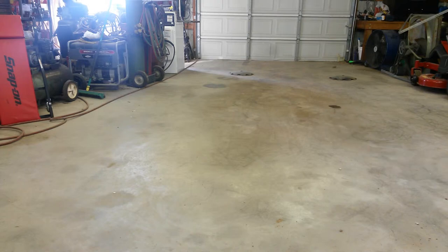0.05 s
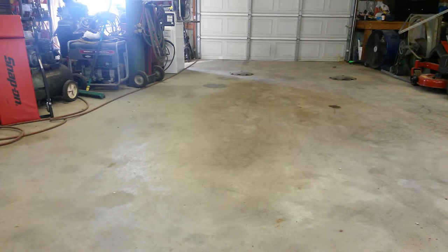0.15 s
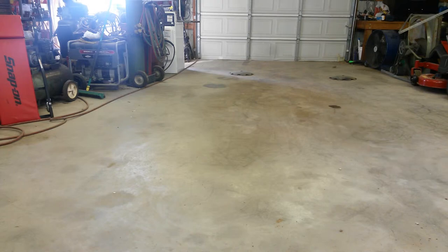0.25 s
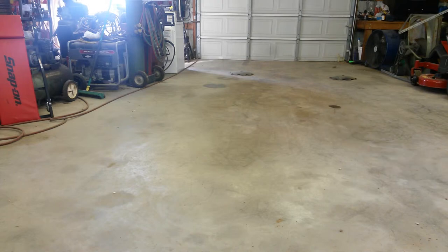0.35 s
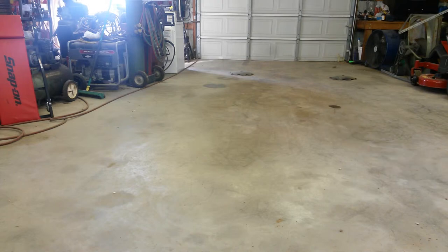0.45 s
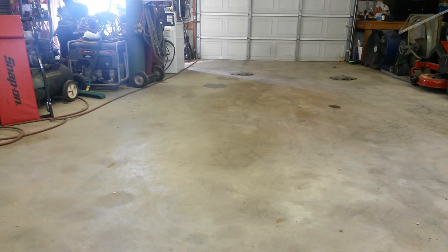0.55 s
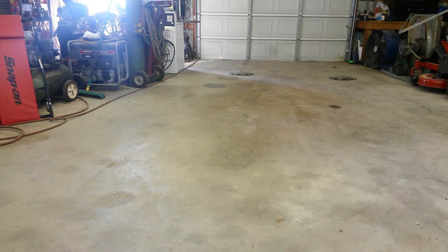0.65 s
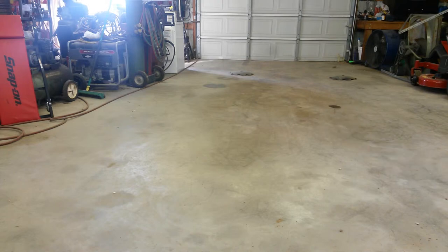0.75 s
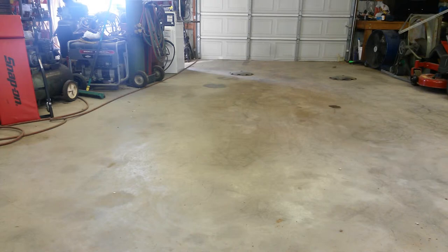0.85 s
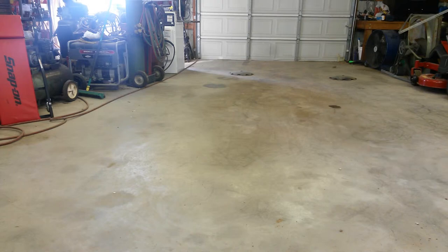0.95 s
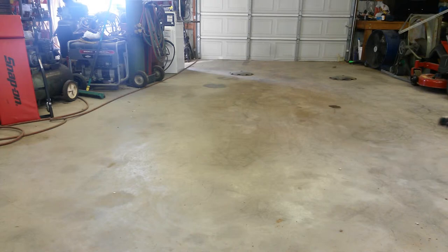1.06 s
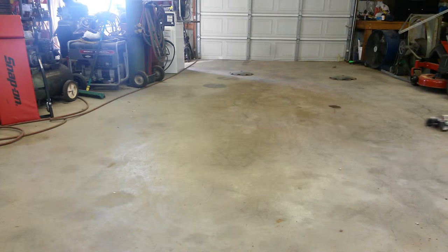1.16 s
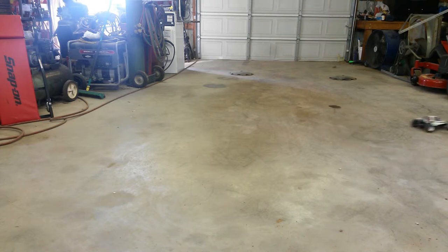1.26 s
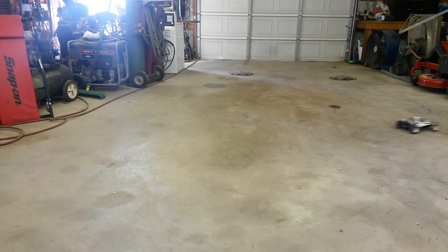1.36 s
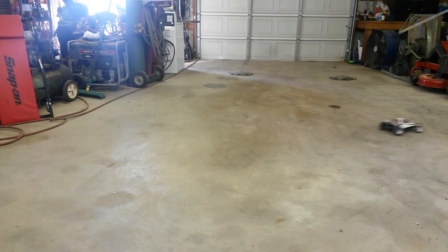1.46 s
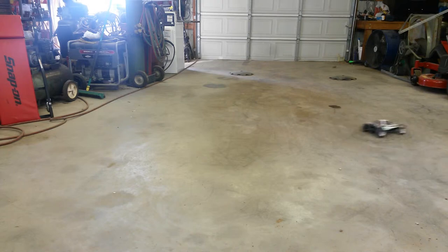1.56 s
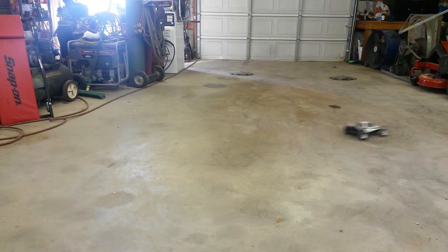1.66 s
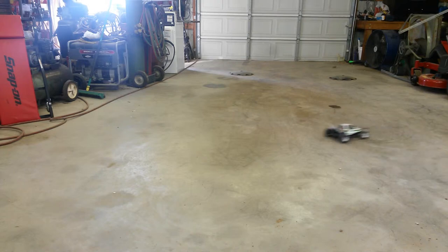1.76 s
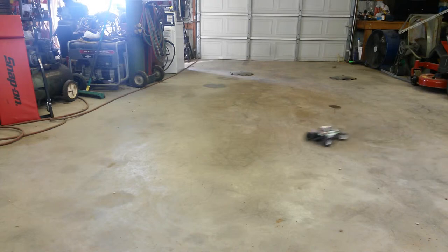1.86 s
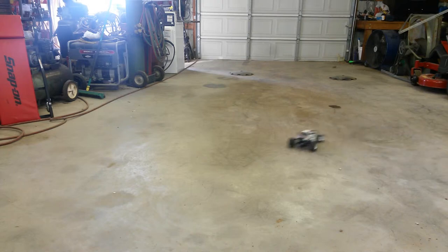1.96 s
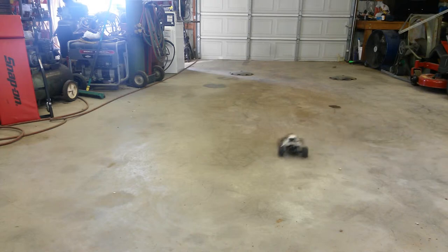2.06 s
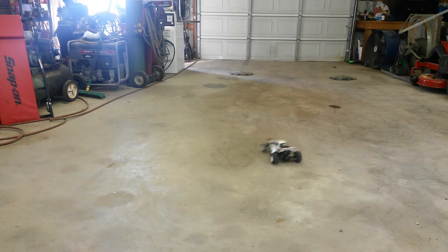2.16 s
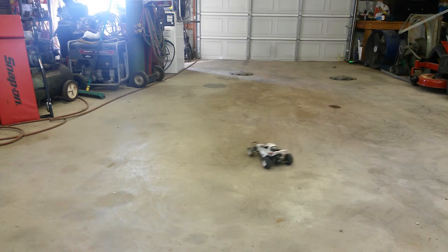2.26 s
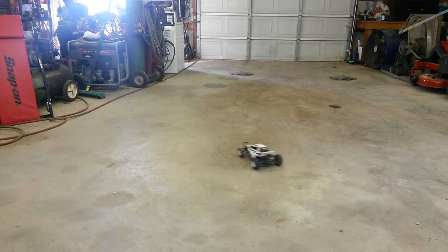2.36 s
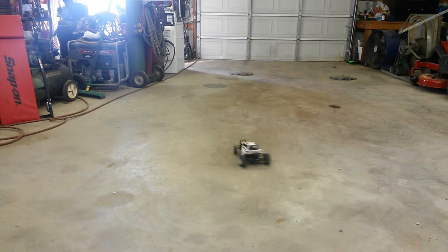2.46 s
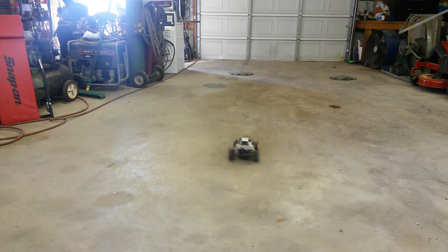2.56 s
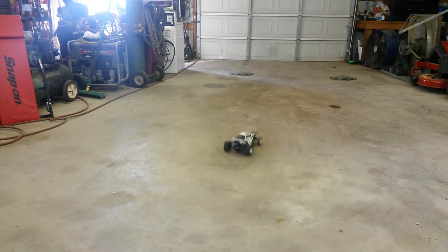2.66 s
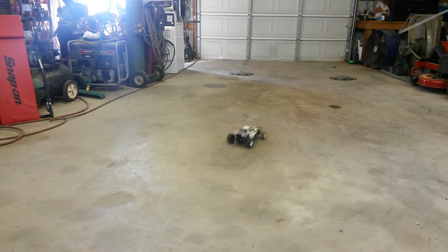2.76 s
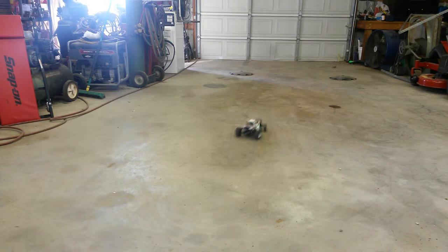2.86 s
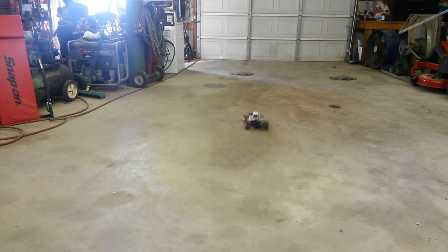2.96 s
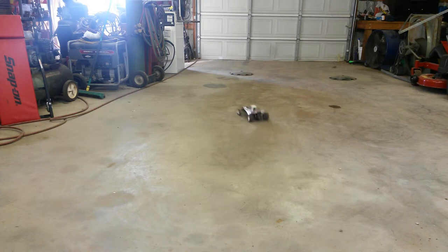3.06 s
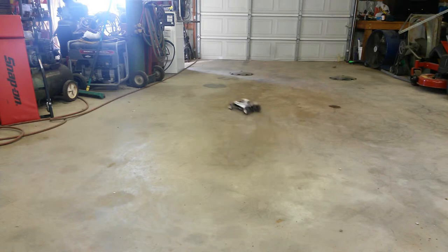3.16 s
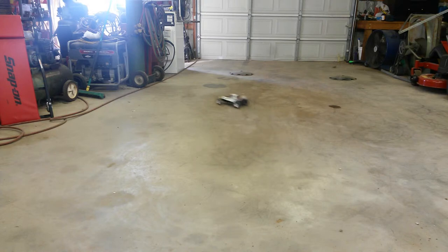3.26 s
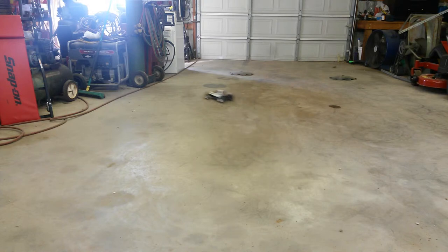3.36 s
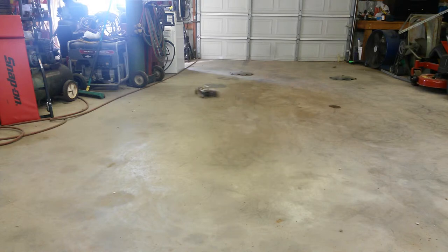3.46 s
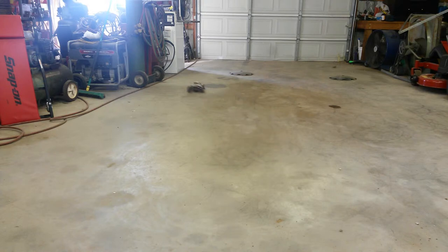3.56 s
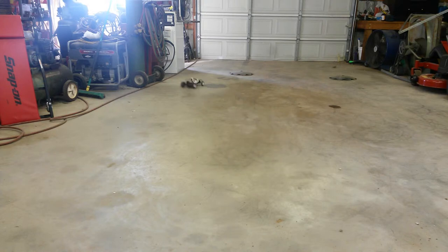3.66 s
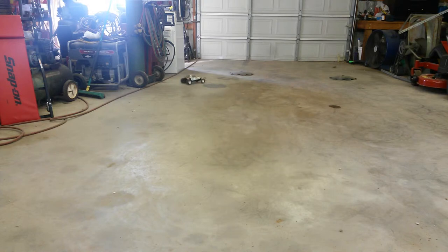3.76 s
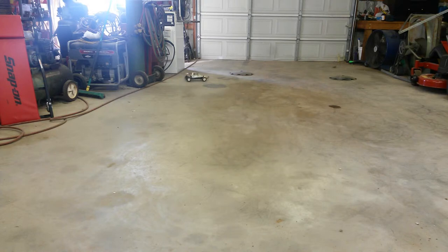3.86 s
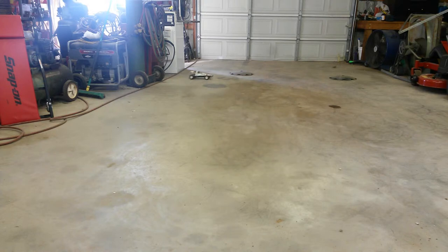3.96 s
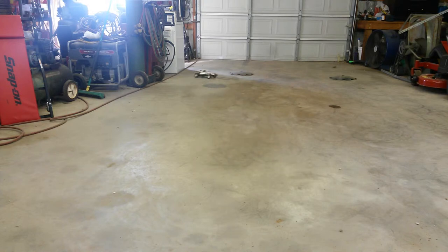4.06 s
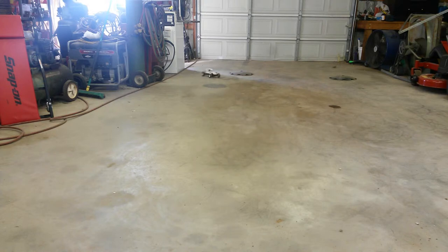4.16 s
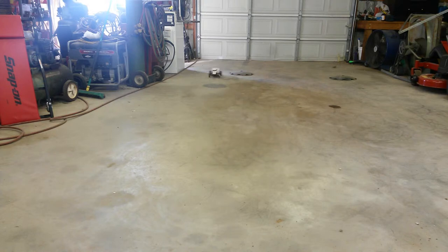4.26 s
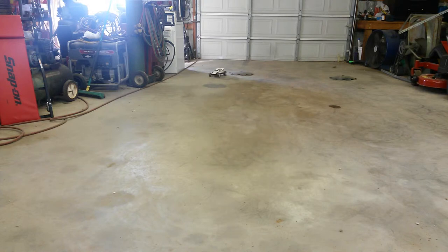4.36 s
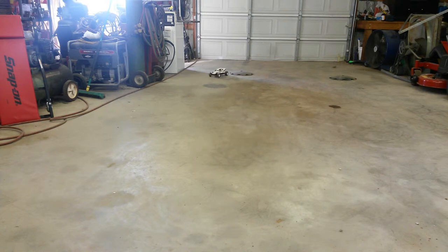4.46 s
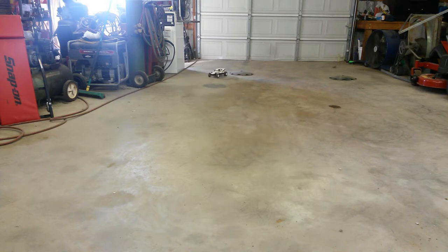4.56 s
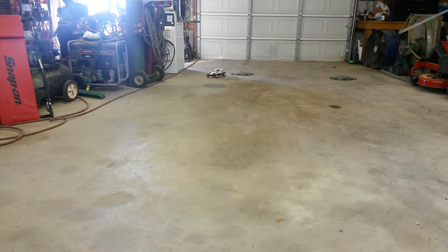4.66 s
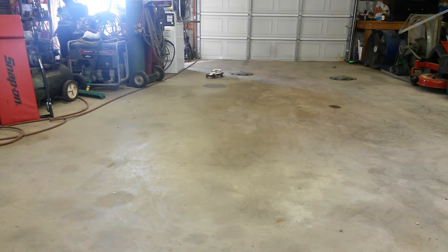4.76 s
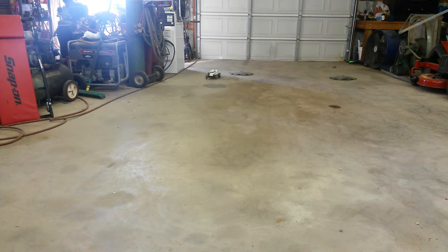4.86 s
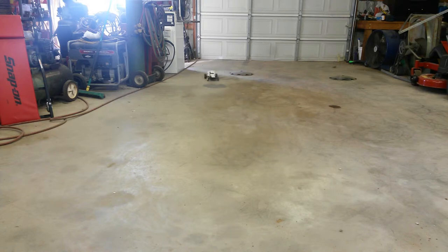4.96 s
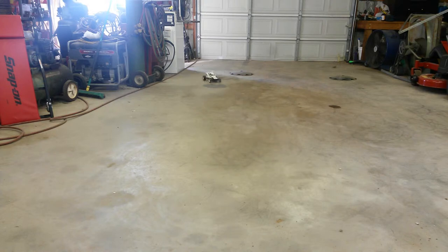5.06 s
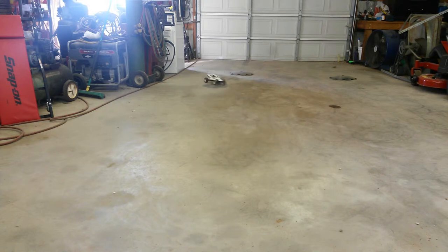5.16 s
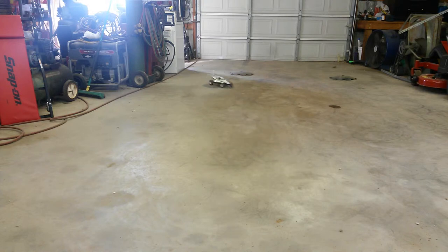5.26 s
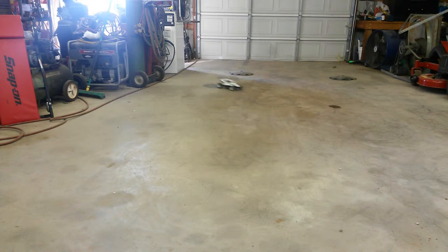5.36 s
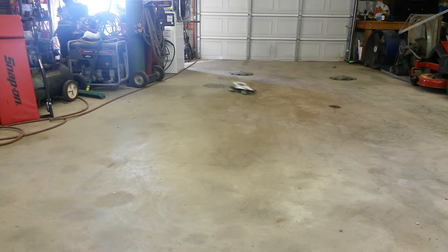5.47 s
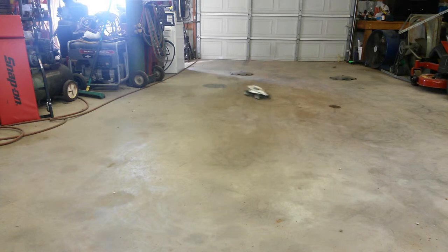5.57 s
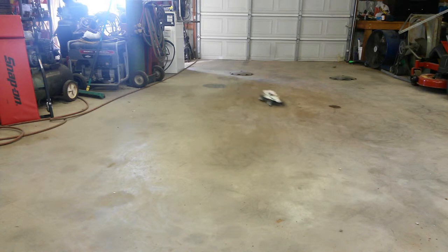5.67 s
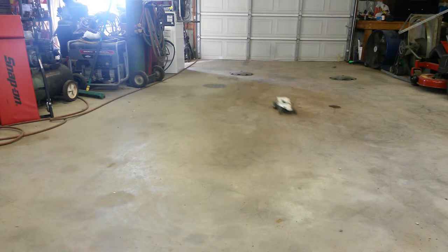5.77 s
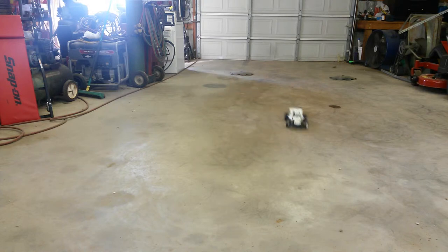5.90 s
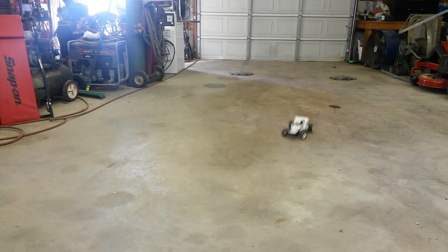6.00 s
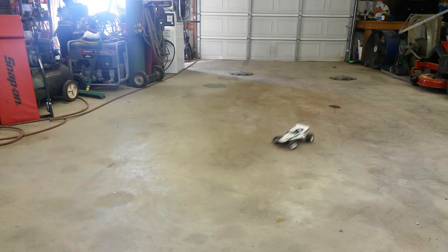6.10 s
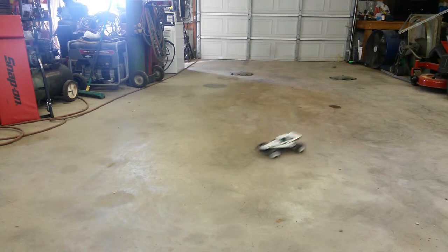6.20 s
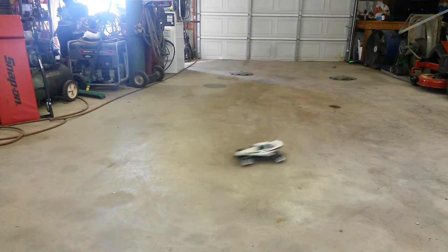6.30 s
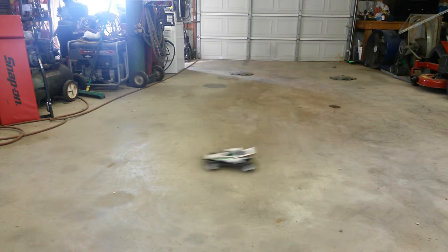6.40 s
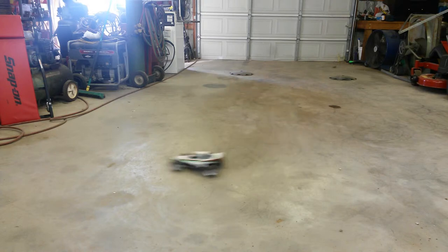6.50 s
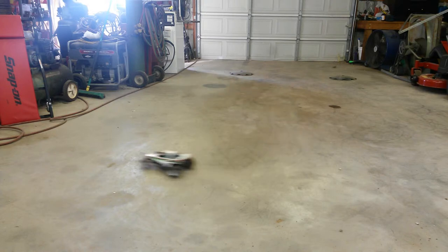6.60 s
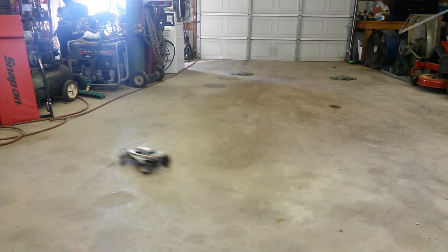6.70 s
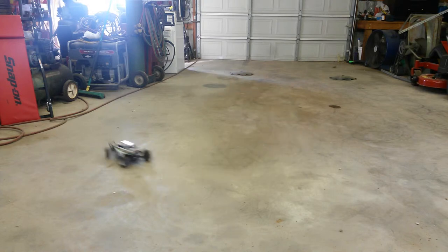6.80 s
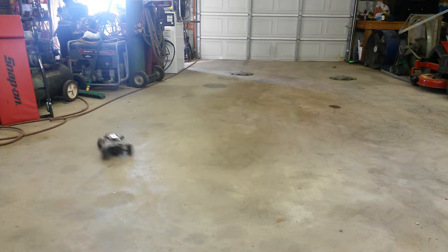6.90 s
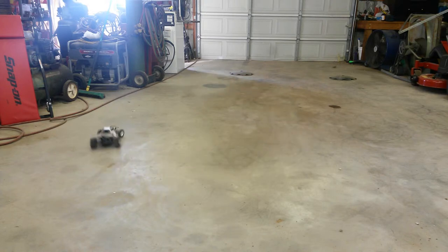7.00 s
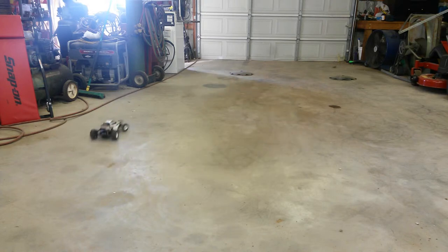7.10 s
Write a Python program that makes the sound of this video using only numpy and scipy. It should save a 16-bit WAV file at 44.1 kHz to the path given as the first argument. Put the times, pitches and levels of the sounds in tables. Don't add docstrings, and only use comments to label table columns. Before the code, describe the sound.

In an enclosed hard-walled garage, a toy buggy with an electric motor starts quietly after two clicks: soft rolling hiss, rising whine, wavering steady whistle. Then it is floored five times, the first burst longest and loudest, with shrill buzzing gears, chattering tyres, gritty scrub and a low axle hum. Each release sags quickly. A fixed stereo microphone catches the car and bright reverberation.

```python
import sys
import numpy as np
from scipy import signal
from scipy.fft import rfft, irfft
from scipy.io import wavfile
from scipy.ndimage import uniform_filter1d

SR = 44100
rng = np.random.default_rng(int(sys.argv[2]) if len(sys.argv) > 2 else 0)


def dump(signal):
    limited = np.clip(np.atleast_2d(signal).T, -1, 1)
    pcm = np.round(limited * 32767).astype(np.int16)
    wavfile.write(sys.argv[1], SR, pcm)


def voltage_ratio(decibels):
    exponent = np.asarray(decibels, float) / 20
    return 10 ** exponent


N = 314874


def evened(x):
    return x / np.sqrt(np.mean(x ** 2) + 1e-20)


def read(points, hz):
    f, value = np.transpose(points)
    return np.interp(np.log(hz + 1), np.log(f + 1), value)


def drift(count, rate_hz):
    z = rfft(rng.standard_normal(count))
    hz = np.fft.rfftfreq(count, 1 / SR)
    return evened(irfft(z / (1 + (hz / rate_hz) ** 2), count))


def unroll(rows):
    s, *columns = np.transpose(rows)
    start = round(s[0] * SR)
    t = np.arange(start, min(round(s[-1] * SR), N)) / SR
    fade = np.clip(np.minimum(t - t[0], t[-1] - t) / 0.014, 0, 1)
    return slice(start, start + len(t)), fade, [np.interp(t, s, c) for c in columns]


def phase(hz):
    return 2 * np.pi * np.cumsum(hz) / SR


# (frequency [Hz], correlation [-1..1])
LIKENESS = [(60, 0.73), (120, 0.57), (240, 0.61), (480, 1), (950, -0.12), (1890, 0.11), (3770, -0.14),
            (7520, -0.2), (15000, 0.21)]


def pair_noise(size, level):
    hop = size // 4
    hz = np.fft.rfftfreq(size, 1 / SR)
    t = np.arange(N // hop + 5) * hop / SR
    a, b, c, d = rng.standard_normal((len(t), len(hz), 4)).T
    same = np.clip(read(LIKENESS, hz), -1, 1)[:, None]
    left = a + 1j * b
    right = same * left + np.sqrt(1 - same ** 2) * (c + 1j * d)

    def to_sound(z):
        return signal.istft(z, nperseg=size, noverlap=size - hop)[1]

    unit = np.sqrt(np.mean(to_sound(left) ** 2) / len(hz))
    return to_sound(np.array([left, right]) * level(t, hz))[:, :N] / unit


# (frequency [Hz], density [dB per Hz])
HUSH_COLOUR = [(15, -54), (25, -25), (64, -5.5), (82, -12), (92, -4.5), (195, -9.5), (335, -10.5),
               (911, -16), (1020, -4.5), (1130, -52), (4370, -38.5), (7310, -23.5), (16000, -15.5)]


def hush():
    noise = pair_noise(size=2048, level=lambda t, hz: voltage_ratio(read(HUSH_COLOUR, hz))[:, None])
    return voltage_ratio(-51) * evened(noise)


# (frequency [Hz], t60 [s])
GARAGE_T60 = [(300, 0.29), (2000, 0.63), (5000, 0.59), (12000, 0.19)]


def garage(x):
    taps = np.zeros((2, SR))
    at = np.arange(200, SR - 20, 20) + rng.integers(0, 20, (2, (SR - 201) // 20))
    np.put_along_axis(taps, at, rng.choice([-1., 1.], at.shape), 1)
    hz, t, z = signal.stft(taps, SR, nperseg=256)
    decay = voltage_ratio(-60 * t / read(GARAGE_T60, hz)[:, None])
    tail = signal.istft(z * decay, SR, nperseg=256)[1]
    return signal.fftconvolve(x[None], tail / np.linalg.norm(tail[0]), axes=1)[:, :N]


# (delay [ms], level [dB])
EARLY_ECHOES = [(.4, -10), (1.7, -8.5), (3.1, -6.5), (5.3, -7)]


def early(x):
    taps = np.zeros((2, 512))
    taps[:, 0] = 1
    for ms, db in EARLY_ECHOES:
        taps[0, round(ms * SR / 1000)] = voltage_ratio(db)
        taps[1, round(1.3 * ms * SR / 1000)] = -voltage_ratio(db)
    return signal.oaconvolve(x[None], taps / np.linalg.norm(taps[0]), axes=1)[:, :N]


# (time [s], peak [dB])
CLICKS = [
    (0.205, -19),
    (0.518, -24),
]
# (frequency [Hz], level [dB], t60 [s])
LEVER_MODES = [(587, -10, 0.082), (2680, -7, 0.034), (4230, 10, 0.009), (4870, 8.5, .015),
               (8000, -9, 0.026), (11800, 0, 0.011)]


def trigger():
    t, out = np.arange(3000) / SR, np.zeros(N)
    ring = sum(voltage_ratio(db - 60 * t / t60) * np.sin(2 * np.pi * hz * t) for hz, db, t60 in LEVER_MODES)
    for s, db in CLICKS:
        out[round(s * SR):][:len(t)] += voltage_ratio(db) * ring / np.abs(ring).max()
    return out


# (time [s], level [dB])
WHISTLE = [
    (0.56, -80),
    (0.6, -54),
    (0.684, -46),
    (1.06, -40.5),
    (1.36, -45.5),
    (1.66, -39.5),
    (1.92, -47),
    (2.1, -46.5),
    (2.22, -49),
]
# (time [s], half width [s], level [dB])
DROPOUTS = [
    (1.426, 0.039, -24),
    (1.99, 0.035, -13.5),
]


def chopper():
    chop_hz, sag_hz_per_s = 972.4, 1.2
    out = np.zeros(N)
    at, fade, (db,) = unroll(WHISTLE)
    t = np.arange(at.start, at.stop) / SR
    for s, half_s, drop_db in DROPOUTS:
        db = db + drop_db * np.exp(-((t - s) / half_s) ** 2)
    turn = phase(chop_hz - sag_hz_per_s * (t - t[0]))
    out[at] = np.sqrt(2) * fade * voltage_ratio(db) * (np.cos(turn) + voltage_ratio(-16) * np.cos(2 * turn))
    return out


# (time [s], length [s], start frequency [Hz], end frequency [Hz], level [dB])
JUDDER = [
    (2.178, 0.32, 2067, 2210, -22.5),
    (2.537, .6, 2127, 2240, -25.5),
    (4.879, .35, 2046, 2163, -28),
    (5.957, 0.21, 1975, 1180, -31.5),
    (6.199, 0.064, 1584, 2470, -33.5),
]
# (start [s], end [s], frequency [Hz], level [dB])
AXLE = [
    (2.94, 4.4, 914, -49.5),
    (4.399, 5.793, 949, -53),
    (5.801, 6.807, 927, -44),
]


def chassis():
    rise_s, fade_db = 0.0296, -12
    modes = []  # curve, width Hz, level dB
    for s, length_s, hz, end_hz, db in JUDDER:
        shake = [(s, hz, db - 13), (s + rise_s, hz, db), (s + length_s, end_hz, db + fade_db)]
        modes.append((shake, 110, -3.5))
    for start, end, hz, db in AXLE:
        modes.append(([(start, hz, db), (end, hz + 25.0, db)], 55, -4))
    out = np.zeros(N)
    for rows, width_hz, trim_db in modes:
        at, fade, (hz, db) = unroll(rows)
        turn = phase(hz)
        ring = drift(len(hz), width_hz) * np.cos(turn) + drift(len(hz), width_hz) * np.sin(turn)
        grain_db = 5.13 * drift(len(hz), rate_hz=53)
        out[at] += fade * voltage_ratio(db + trim_db + grain_db) * ring
    return out


# (on [s], rise [s], held [s], level [dB], coasting loss [dB per s])
THROTTLE = [
    (2.17, 0.1, 1.57, 3, 42),
    (3.953, 0.026, 0.67, 0, 95),
    (4.832, 0.081, 1.07, 1, 24.5),
    (6.189, 0.043, 0.41, 0.5, 67),
    (6.79, 0.08, 0.32, 1.5, 90),
]


def throttle_db(t):
    on, rise, held, db, loss_db = np.transpose(THROTTLE)[:, :, None]
    idle_db = -12
    climb_db = idle_db * np.clip(1 - (t - on) / rise, 0, 1)
    shape = db + climb_db - loss_db * np.maximum(t - on - held, 0)
    return np.where(t >= on, shape, -40).max(axis=0)


# (time [s], level under steady rolling [dB])
EFFORT = [
    (0.0, -4.5),
    (0.5, -31.5),
    (0.6, -18.5),
    (0.91, -5),
    (1.17, 1.5),
    (2.17, 0.5),
]
# (rolling level [dB], share of effort [dB/dB], spinning level [dB],
# share of throttle [dB/dB], coasting outlasted [dB, sign ignored])
PARTS = [
    (-44.5, 0.53, -35, 0.43, -2.5),
    (-32.5, 0.8, -28.5, 0.7, 5.5),
    (-28, 1.07, -18.5, 0.94, 2.5),
    (-32.5, 1.36, -22.5, 1.38, 2.5),
]
PART_EDGES_HZ = [950, 3500, 9200]
# (frequency [Hz], density [dB per Hz])
ROLL_COLOUR = [(120, -53), (200, -34), (590, 2), (867, -9), (968, -2.5), (1080, -22.5), (2560, -16),
               (3560, -17), (4950, -7), (8900, -20.5), (10900, -2), (14600, -14), (16000, -53)]
# (frequency [Hz], density [dB per Hz])
SPIN_COLOUR = [(120, -87), (200, -26), (409, -39.5), (579, -7.5), (806, -24.5), (1210, -14.5), (2560, -4),
               (3020, -15.5), (5130, 3), (5840, -1), (7680, -6), (8580, -11), (12600, 2), (14600, -16),
               (16000, -23)]


def scrub_cells(t, hz):
    grip_lost_s = 2.19
    roll_db, roll_share, spin_db, spin_share, slack_db = np.transpose(PARTS)[:, :, None]
    push_db = throttle_db(t)
    push_db = push_db + np.clip(-push_db, 0, np.abs(slack_db))
    rolling_db = roll_db + roll_share * np.interp(t, *np.transpose(EFFORT))
    parts_db = np.where(t < THROTTLE[0][0], rolling_db, spin_db + spin_share * push_db)
    part = np.searchsorted(PART_EDGES_HZ, hz)

    def part_colour(table):
        c = voltage_ratio(read(table, hz))
        return (c / np.sqrt(np.bincount(part, c ** 2))[part])[:, None]

    colour = np.where(t < grip_lost_s, part_colour(ROLL_COLOUR), part_colour(SPIN_COLOUR))
    level_db = parts_db[part]
    for on, rise, *_ in THROTTLE:
        level_db = level_db - 1.0 * (part == 2)[:, None] * ((t > on) & (t < on + rise + .06))
    uneven = rng.standard_normal((len(t), len(PARTS)))
    for _ in range(2):
        uneven = uniform_filter1d(uneven, size=30, axis=0)
    uneven_db = np.array([[1.1], [.9], [.6], [1.2]]) * evened(uneven).T
    level_db = uniform_filter1d(level_db + uneven_db[part], size=5, axis=0)
    bumps = evened(uniform_filter1d(rng.standard_normal(len(t)), size=3))
    bumps = bumps * np.clip(hz / 1500, 0, 1)[:, None]
    patches = uniform_filter1d(rng.standard_normal((len(t), len(hz))).T, size=7, axis=0)
    patches = evened(uniform_filter1d(patches, size=16, axis=1))
    return colour * voltage_ratio(level_db + 0.59 * bumps + 1.63 * patches - 7.0)


# (time [s], tooth rate [Hz], load [dB])
ROLL = [
    (0.72, 930, -54),
    (0.876, 1116, -50),
    (1.0, 1420, -40.5),
    (1.151, 1696, -39),
    (1.299, 1971, -36),
    (1.5, 2245, -40.5),
    (1.7, 2476, -35),
    (1.91, 2654, -34.5),
    (2.18, 2750, -31.5),
]
# (time [s], tooth rate [Hz], tooth pressure [dB])
MESH_SPEED = [
    [(2.21, 1342, -19), (2.258, 1870, -16), (2.305, 2140, -19.5), (2.335, 2401, -19.5), (3.12, 2455, -18)],
    [(3.11, 2643, -17), (3.4, 2710, -19.5), (3.6, 2543, -15.5), (3.7, 2760, -20), (3.88, 2790, -27)],
    [(3.965, 1850, -24), (3.998, 2082, -17.5), (4.02, 2110, -19), (4.035, 2501, -17.5), (4.21, 2650, -14.5),
     (4.53, 2605, -12.5), (4.79, 2477, -17.5)],
    [(4.86, 1643, -14), (4.885, 2000, -14.5), (5.2, 2080, -23.5)],
    [(5.22, 2453, -14.5), (5.7, 2540, -15), (5.83, 2710, -16.5), (5.96, 2754, -18.5), (6.06, 2840, -39)],
    [(5.99, 2290, -21), (6.17, 2183, -14)],
    [(6.2, 1750, -19), (6.265, 2350, -25), (6.29, 2518, -13), (6.46, 2680, -13.5), (6.57, 2635, -14.5),
     (6.77, 2630, -28)],
    [(6.79, 848, -35), (6.838, 1335, -19.5), (6.857, 1698, -18.5), (6.888, 2210, -14), (6.932, 2220, -12.5),
     (6.945, 2477, -12.5), (7.14, 2518, -18)],
]
SLIP = [2.5, 1.5, 1.7, 2.3, 1.4, 1.8, 1.6, 1.1]
# (first [dB], third [dB], higher [dB])
ROLL_TONES = (7.9, -4, -6)
# (first [dB], third [dB], higher [dB])
FIRM_TONES = (-8, 1.4, -0.5)
# (first [dB], third [dB], higher [dB])
FREE_TONES = [(-3, -3, -10.5), (-4.5, -6, 2), (-5.5, -6, 0), (-7.5, -3.5, -5), (-4, -9.5, -1.5),
              (-17, -19, -7), (-5, -3, -5), (-12.5, -8.5, -4)]
# (frequency [Hz], gain [dB])
SHELL = [(700, -23), (1500, -10.5), (2100, -8), (2600, -18), (3100, -33.5), (4000, -20), (4600, -8.5),
         (5200, -8), (6000, 0.5), (7000, -8.5), (8000, -19), (9000, -23), (10500, -15), (12000, -10),
         (13500, -27), (15000, -28)]
# (share of tooth rate [1], level against load [dB])
IDLER = (0.5, -10.0)


def gears():
    firm_hz_per_s, firm_below_hz, firm_slip = 4000, 2140, .6
    out = np.zeros(N)
    for rows, slip, free in zip([ROLL] + MESH_SPEED, [1.1] + SLIP, [ROLL_TONES] + FREE_TONES):
        at, fade, (hz, load_db) = unroll(rows)
        count = len(hz)
        if rows is ROLL:
            tone_db = np.array(free)[:, None]
        else:
            gain_hz_per_s = uniform_filter1d(np.gradient(hz) * SR, size=300)
            firm = np.clip(gain_hz_per_s / firm_hz_per_s, 0, 1) * np.clip((firm_below_hz - hz) / 100, 0, 1)
            tone_db = np.outer(FIRM_TONES, firm) + np.outer(free, 1 - firm)
            slip = slip + (firm_slip - slip) * firm
            load_db = load_db + throttle_db(np.arange(at.start, at.stop) / SR)
        wander_db = 1.5 * np.array([drift(count, rate_hz=27) for _ in tone_db])
        first_db, third_db, upper_db = tone_db + wander_db
        wobble = 0.01368 * drift(count, rate_hz=80.4) + 0.005034 * drift(count, rate_hz=20.2)
        turn = phase(hz * (1 + slip * wobble))
        clumps_db = 2.3 * drift(count, rate_hz=165) + 1.42 * drift(count, rate_hz=6.3)
        clumps = evened(voltage_ratio(clumps_db))
        for k in range(1, 9):
            balance_db = first_db * (k == 1) + third_db * (k == 3) + upper_db * (k > 3)
            level = voltage_ratio(load_db + read(SHELL, k * hz) + balance_db)
            skirt = 0.11 * drift(count, rate_hz=230 + 40 * k)
            out[at] += np.sqrt(2) * fade * clumps * level * (1 + skirt) * np.cos(k * turn)

    at, fade, (hz, db) = unroll(ROLL)
    share, idler_db = IDLER
    turn = phase(share * hz * (1 + 0.0264 * drift(len(hz), rate_hz=75)))
    level = voltage_ratio(db + idler_db + 5.0 * drift(len(hz), rate_hz=11))
    out[at] += np.sqrt(2) * fade * level * np.cos(turn)
    return out


def scene():
    car, clicks = gears() + chassis(), trigger()
    near = voltage_ratio(-2) * early(car) + chopper() + clicks
    far = garage(voltage_ratio(-7) * car + voltage_ratio(-7) * clicks)
    return near + far + pair_noise(size=512, level=scrub_cells) + hush()


def top_cut(x):
    return signal.sosfilt(signal.butter(12, 15870, fs=SR, output="sos"), x)


# (frequency [Hz], left minus right [dB])
PORTS = [(200, 0), (500, -3), (1100, -2), (1800, -2), (2700, 5), (3600, 4), (4600, 13), (6400, 9),
         (8000, -1), (8800, 6.5), (10000, -32.5), (15000, -7)]


def record(dry):
    left_share = 1 / (1 + voltage_ratio(-2 * read(PORTS, np.fft.rfftfreq(N, 1 / SR))))
    gains = 2 * np.sqrt([left_share, 1 - left_share])
    heard = irfft(rfft(dry, axis=1) * gains, N, axis=1)
    return top_cut(np.clip(voltage_ratio(-.6) * heard, -.9, .9))


dry = scene()
out = record(dry)
dump(out)
```